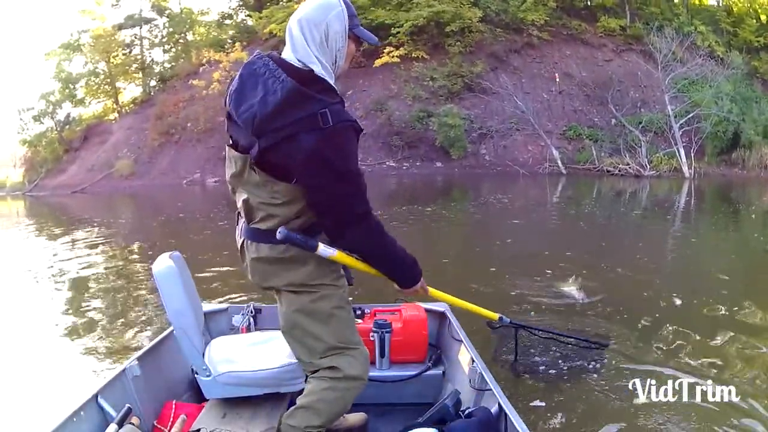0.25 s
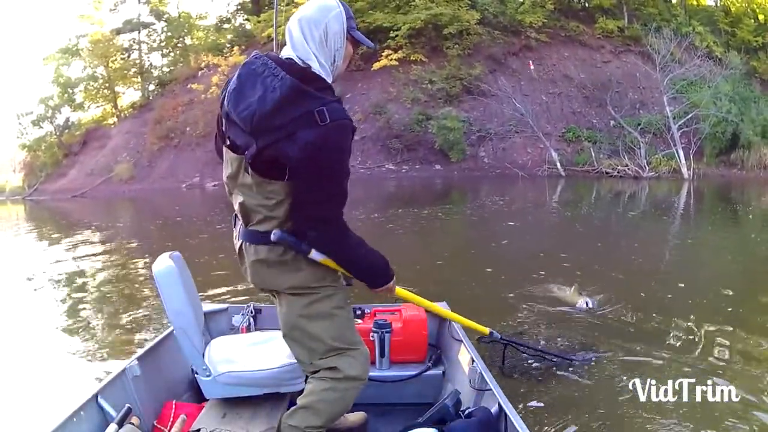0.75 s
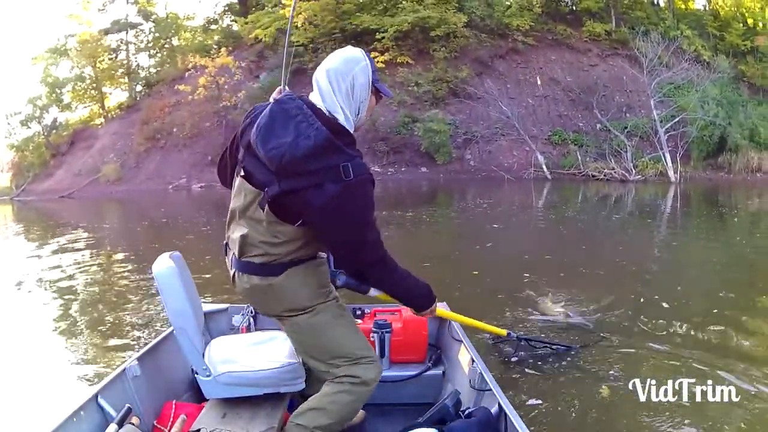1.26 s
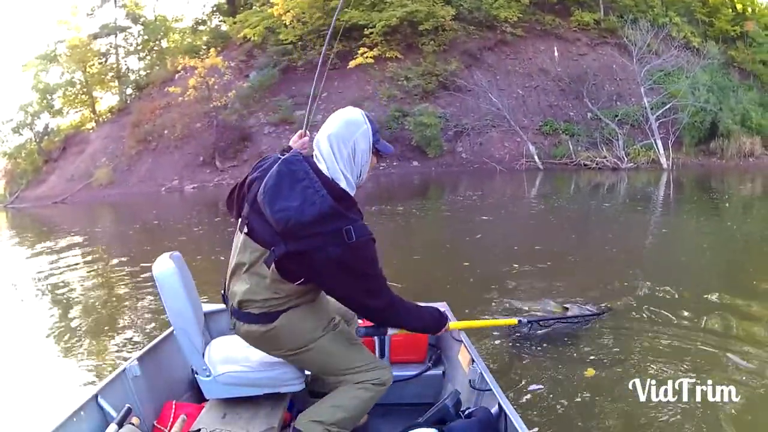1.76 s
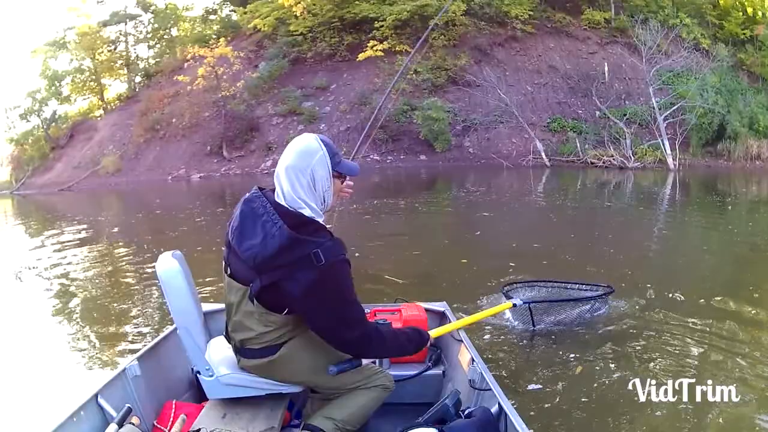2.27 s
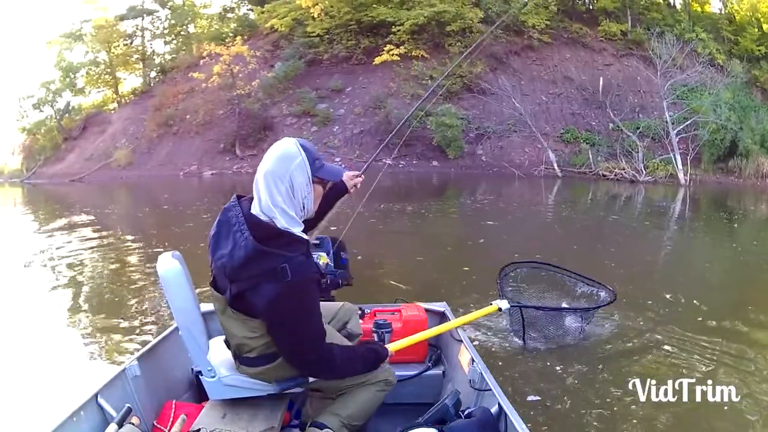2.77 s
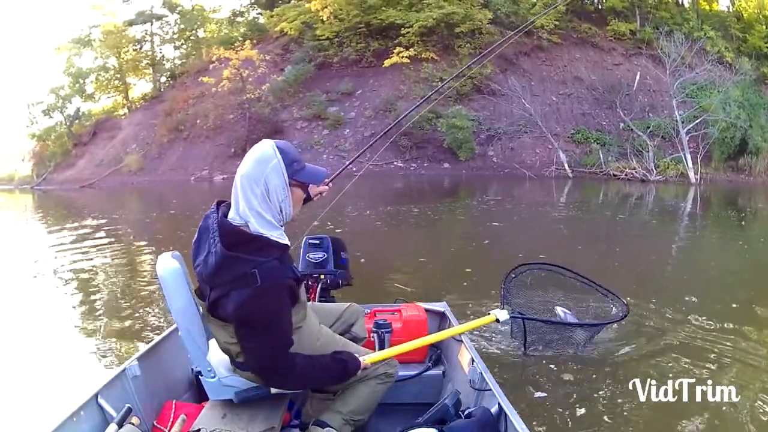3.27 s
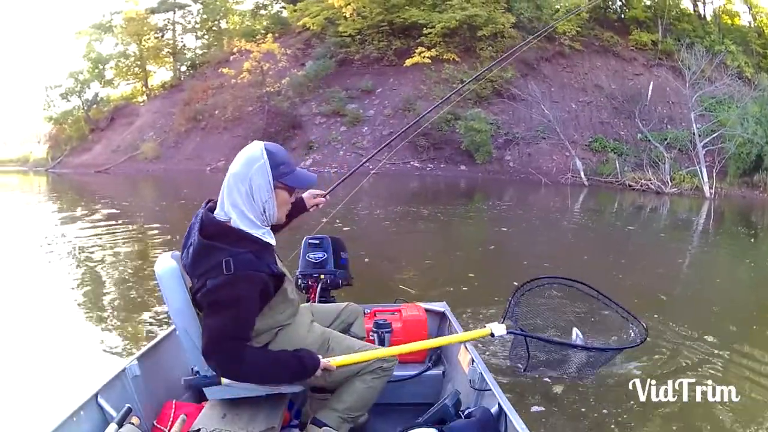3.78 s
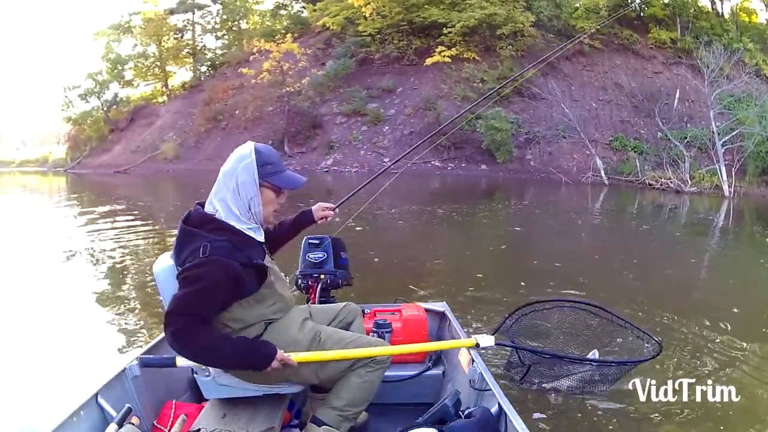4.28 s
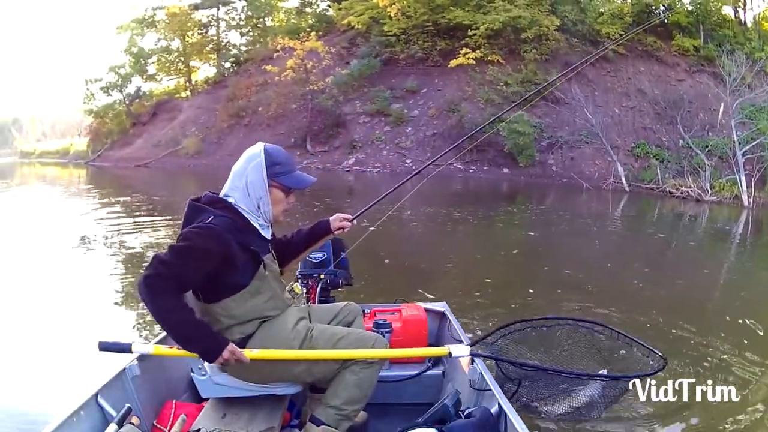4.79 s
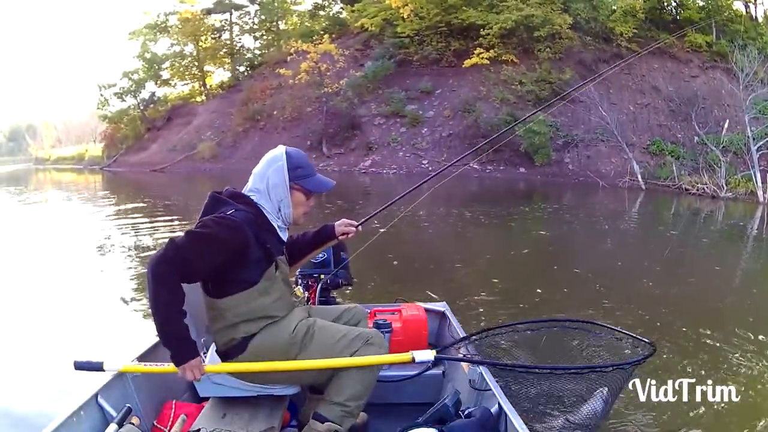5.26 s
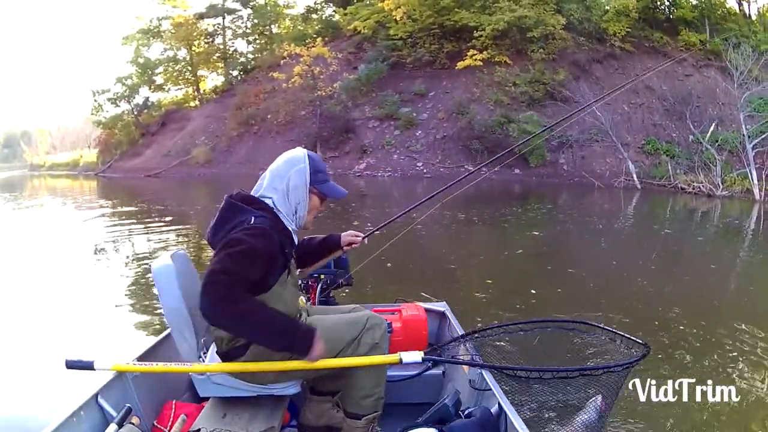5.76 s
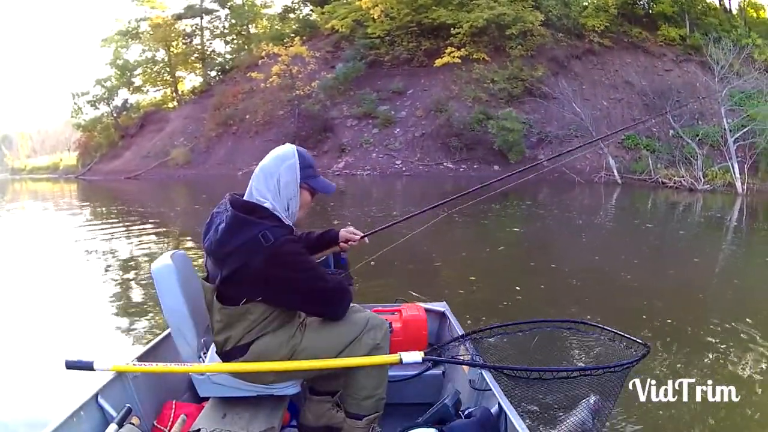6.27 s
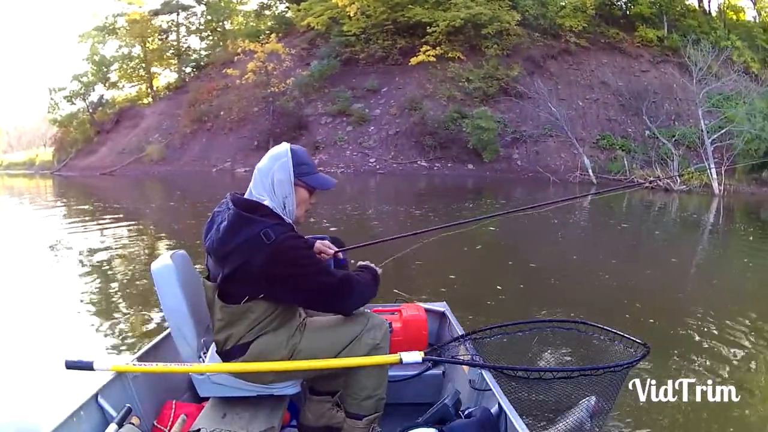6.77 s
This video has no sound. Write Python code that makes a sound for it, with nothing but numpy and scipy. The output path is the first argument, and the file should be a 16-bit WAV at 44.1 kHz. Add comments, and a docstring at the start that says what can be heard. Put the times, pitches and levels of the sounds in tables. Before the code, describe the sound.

A net pole bounces on a hollow metal hull: one abrupt bang with a quick rattle near the start, drips and tiny splashes after it, then a pause with barely audible taps. A busy, uneven clatter follows, dragging and booming along the rim, and stops. Gentle lapping, low wind, faint high ticks and distant bird chirps surround it, recorded close on a small camera microphone with thin hiss.

```python
"""Net pole on a small aluminium boat, calm river

Close by, a landing net's pole knocks, bounces and drags along the gunwale: noisy forces ring hollow hull modes.
The net sheds drops, made as rising bubble tones and noisy smacks; wind and water are shaped, wavering noise.
Faint high ticks are narrow noise bursts; an insect and a bird on the bank are pulsed and falling tones.
A weak drone, hiss, fuzzy flickering lines and a thin electrical whine pulsing high up lie underneath."""
import sys
import numpy as np
from scipy import signal
from scipy.fft import rfft, irfft, next_fast_len
from scipy.io import wavfile
from scipy.ndimage import uniform_filter1d, map_coordinates

SR = 44100
rng = np.random.default_rng(int(sys.argv[2]) if len(sys.argv) > 2 else 0)


def natural_amplitude(level_db):
    """Convert a level in decibels to a linear amplitude factor, elementwise."""
    exponent = np.asarray(level_db, float) / 20
    return 10 ** exponent


def dump(signal):
    """Clip the signal to [-1, 1] and save it as 16-bit WAV at the path in sys.argv[1]."""
    limited = np.clip(np.atleast_2d(signal).T, -1, 1)
    pcm = np.round(limited * 32767).astype(np.int16)
    wavfile.write(sys.argv[1], SR, pcm)


N = 310023  # length in samples, about 7 s

# main hull modes before each blow weights them: pitch_hz, level_db, t60_s
HULL_MODES = [(82, -35, 0.42), (119.7, -12.5, 0.76), (185.5, -5, 0.48), (236.5, -15, 0.63),
              (286.6, -1, 0.21), (342.3, -7.5, 0.38), (421.5, -8, 0.46), (462.8, -8.5, 0.53),
              (509.7, -9.5, 0.16), (618.3, -1.5, 0.23), (688.6, 0.5, 0.32), (711, -1.5, 0.06),
              (805, -2.5, 0.23), (860.7, 4, 0.16), (920, 0, 0.44), (946, 5.5, 0.16), (1000, 1, 0.33),
              (1081, -8, 0.19), (1153, 2.5, 0.093), (1198, 4, 0.13), (1568, -9.5, 0.25), (2010, -16, 0.091),
              (2230, -13, 0.16)]
# trend of the many lesser plate modes: pitch_hz, level_db, t60_s
LESSER_MODES = [(62.6, -25, 0.45), (207, -17.5, 0.4), (271, -4.5, 0.51), (596, -10, 0.31), (1000, -9, 0.3),
                (1230, -24, 0.15), (1350, -16, 0.27), (2250, -16, 0.23), (2650, -28, 0.12),
                (2690, -19, 0.22), (3420, -33, 0.16), (4146, -29, 0.19)]
# blows on the gunwale: start_s, level_db, crack_db (added to level_db), free_ring_s,
# favoured_hz, boom_db (weight of the low modes)
KNOCKS = [(1.89, -34, -21, 0.071, 586, -6), (1.922, -6, -34, 0.017, 850, -4),
          (1.945, -15.5, -61, 0.025, 715, -3), (1.972, -17.5, -63, 0.026, 600, -6),
          (2.183, -40, -14, 0.032, 640, -3), (2.211, -41, -13.5, 0.037, 815, -8),
          (2.589, -36, -21, 0.082, 860, -7), (2.919, -32.5, -34, 0.053, 850, -15),
          (3.366, -33.5, -38, 0.13, 1000, 3), (4.045, -29.5, -30, 0.05, 988, -15),
          (4.453, -15, -38, 0.046, 742, -2.5), (4.488, -17.5, -50, 0.098, 895, 0.5),
          (4.568, -25, -34, 0.02, 840, -7), (4.644, -18, -25, 0.042, 950, -4),
          (4.653, -10, -34, 0.0096, 920, -16), (4.719, -22.5, -27, 0.025, 960, -8),
          (4.736, -20, -29, 0.015, 996, -16), (4.758, -21, -35, 0.016, 970, -10),
          (4.855, -5.5, -28, 0.029, 920, 0), (4.879, -12, -49, 0.034, 687, -13),
          (4.907, -5.5, -18.5, 0.02, 940, 3), (4.919, -6.5, -29, 0.049, 640, -6.5),
          (5.108, -12.5, -20, 0.021, 944, 3), (5.127, -15.5, -35, 0.037, 510, -5),
          (5.176, -16, -19, 0.034, 894, 1), (5.204, -16.5, -54, 0.026, 520, -2),
          (5.276, -18.5, -23, 0.027, 802, -6), (5.282, -15.5, -19, 0.048, 590, -4),
          (5.373, -18, -18, 0.062, 620, -7), (5.396, -18, -24.5, 0.025, 794, -6),
          (5.416, -9.5, -34, 0.04, 990, 4), (5.43, -11.5, -37, 0.039, 695, 1),
          (5.457, -17, -22, 0.068, 693, 3.5), (5.561, -27.5, -27, 0.036, 478, 0),
          (5.592, -22.5, -27.5, 0.04, 950, -6)]
# colour of a blow's sharp front: pitch_hz, relative_db (per Hz)
CRACK_COLOUR = [(1500, 9.5), (2500, 5.5), (4500, -2), (7000, -8), (12000, -7), (15800, -15)]
# colour of loose rivets and gear: pitch_hz, relative_db (per Hz)
RATTLE_COLOUR = [(1300, -11), (2200, 10), (3200, 0), (4100, -2.5), (5500, -20), (8000, -28), (12500, -24),
                 (15800, -30)]
# pole pressing and sliding on the rim, before wavering: time_s, level_db
RUB_LEVEL = [(1.7, -75), (1.85, -62), (1.94, -47), (2.07, -51.5), (2.52, -54.5), (2.64, -44), (2.8, -49.5),
             (2.95, -55), (3.75, -52.5), (4.44, -50), (4.48, -42), (4.6, -40.5), (4.7, -37), (4.812, -37.5),
             (4.946, -38), (5.06, -44.5), (5.176, -52), (5.326, -36.5), (5.47, -37), (5.56, -44),
             (5.638, -51), (5.8, -68), (6.2, -98)]
# boat thudding as weight shifts: peak_s, level_db, rise_s, fall_t60_s
LURCHES = [(4.75, -41, 0.09, 0.39), (4.94, -35.5, 0.057, 0.84), (5.15, -51, 0.047, 1.),
           (5.33, -43, 0.028, 0.33), (5.44, -36, 0.024, 0.68), (5.55, -36.5, 0.08, 0.6)]
# colour of the thuds: pitch_hz, relative_db (per Hz)
LURCH_COLOUR = [(35, -35), (60, -9), (85, -1), (130, 3.5), (220, -6), (300, -31)]
# drops falling from the net into the river, before the envelope: start_s, level_db, bubble_hz
DRIPS = [(0.9544, -47, 1520), (1.465, -42, 1920), (1.5075, -48, 2190), (1.5484, -43, 1980),
         (1.7775, -46, 1900), (2.0622, -35, 1350), (2.1375, -39, 2010), (2.2473, -41, 1573),
         (2.3052, -40, 2230), (2.354, -35.5, 2250), (2.5207, -46, 1430), (2.594, -37, 1930),
         (2.6299, -39, 1760), (2.8544, -42, 2060), (3.0021, -42, 1856), (3.433, -45, 1660)]
# drops smacking the surface without a bubble, before the envelope: start_s, level_db, centre_hz
SPLATS = [(1.003, -48, 3500), (1.091, -53, 1500), (1.181, -58, 1500), (1.306, -50, 4000),
          (2.0078, -44, 5800), (2.0756, -44, 4540), (2.095, -38, 5870), (2.155, -56, 3300),
          (2.1834, -49, 3930), (2.2244, -35, 4380), (2.2503, -45, 3800), (2.3038, -35, 5730),
          (2.3476, -42, 3500), (2.4239, -43, 4440)]
# net stirring the water: centre_s, level_db, half_length_s
SWISHES = [(0.73, -56.5, 0.036), (2.62, -58.5, 0.082), (2.755, -64, 0.099), (2.24, -59, 0.06)]
# wind on the microphone, before wavering: time_s, level_db
WIND_LEVEL = [(0, -46.5), (.5, -44.5), (1.3, -46.5), (1.85, -41.5), (2.4, -45.5), (3.1, -42), (4.4, -43.5),
              (5.8, -47.5), (7.03, -48)]
# colour of the wind: pitch_hz, relative_db (per Hz)
WIND_COLOUR = [(12, -46), (22, -9.5), (45, -2), (100, -6), (170, -9), (300, -36.5)]
# water around hull and net, before wavering: time_s, lapping_db, trickle_db
WATER_LEVEL = [(0, -49.5, -66), (.5, -51, -68), (.8, -49.5, -67), (1.05, -50, -67.5), (1.6, -50, -66),
               (2.1, -48.5, -64.5), (2.5, -50.5, -66), (3.25, -50.5, -64), (4.1, -52, -65),
               (5.8, -50.5, -66), (6.56, -51.5, -65.5), (7.03, -51.5, -63)]
# colour of lapping at the hull: pitch_hz, relative_db (per Hz)
LAPPING_COLOUR = [(120, -44), (200, -1), (300, -1), (345, -4.5), (400, -9), (650, -7.5), (850, -9),
                  (1100, -19.5), (1500, -40)]
# colour of the far trickle: pitch_hz, relative_db (per Hz)
TRICKLE_COLOUR = [(900, -23), (1200, 0), (2200, 0.5), (2550, -7), (2750, -3.5), (3200, -13), (4000, -5.5),
                  (5000, -18)]
# faint high ticks, before the envelope: start_s, level_db, pitch_hz
TICKS = [(0.07, -62, 12600), (0.258, -54.5, 13000), (0.31, -58, 12700), (0.5457, -63, 12650),
         (0.671, -57, 13400), (0.6943, -54.5, 12900), (1.1, -60, 12700), (1.306, -60, 12600),
         (2.297, -63, 11700), (2.678, -61, 12800), (3.1388, -61, 13600), (3.9938, -60, 13700),
         (4.21, -62, 13700), (4.6289, -58, 13700), (5.134, -57, 13800), (5.648, -61, 13700),
         (5.773, -59, 13400), (5.8292, -60, 13600), (6.006, -59, 13900), (6.112, -57, 12600),
         (6.2687, -59, 13700), (6.4837, -59, 13700), (6.506, -58, 13500), (6.6518, -58, 13600),
         (6.8453, -57, 13600)]
# far insect's tone and its overtone, before wavering: pitch_hz, level_db
INSECT = [(2740, -78), (5485, -79.5)]
# far bird's falling chirps: start_s, peak_db, start_hz, end_hz, length_s
CHIRPS = [(3.955, -87, 5300, 5050, .035), (4.025, -72, 4580, 4050, 0.051), (4.175, -69, 4680, 4000, .055),
          (6.625, -67, 4600, 4300, .04)]
# faint drone: time_s, level_db
DRONE_LEVEL = [(0, -55.5), (.6, -60), (1.1, -49), (1.5, -59), (2.4, -54), (3, -80), (7.03, -73)]
# colour of the drone: pitch_hz, relative_db (per Hz)
DRONE_COLOUR = [(325, -3), (340, -12), (352, 8), (368, -12)]
# colour of the electronic hiss: pitch_hz, relative_db (per Hz)
HISS_COLOUR = [(3000, 0.5), (4500, -0.5), (5500, 2), (7500, -1.5), (9500, 1.5), (11000, 0.5), (12000, 1.5),
               (13700, 3.5), (14800, 2.5), (15800, 4)]
# faint unsteady lines, before wavering: pitch_hz, level_db
FLICKER = [(1850, -97), (4000, -89), (5560, -85), (11000, -79), (13750, -86)]

BOOM_HZ, CLANG_HZ = 400, 1250  # borders between low, middle and high hull modes
TOP_HZ = 15870  # upper limit of the band
CREST_DB = 11  # a blow's level_db over the rms of its middle modes in the first 25 ms, before damping
DULLING_DB = 9.5  # loss per unit of log frequency above the favoured modes: a padded contact
BOOM_RISE_S = 0.0027  # time constant: the big panels take a moment to start moving
CLANG_FADE_S = 0.26  # time constant: the resting pole stills the high modes first
KNOCK_CLANG_DB, CLANG_PER_CRACK = 16, 0.39  # high-mode weight; dB added per dB of crack_db
RUB_BOOM_DB, RUB_CLANG_DB = 0.5, -4.5  # weights of low and high modes
RUB_DULLING = 0.15  # dB of clang lost per dB of rubbing above the median: pressing muffles high modes
INSECT_RATE, INSECT_START_S, INSECT_ON = 9.95, 0.066, 0.6  # pulses per s, offset in s, part of cycle on
WHINE_HZ, WHINE_PULSES = 15478, 57.334  # pitch in Hz, pulses per s


def knocks(modes, part, hz):
    """Each blow wakes the modes anew from its own spot; the pole settling back damps the ring."""
    out, t = np.zeros(N), np.arange(SR // 4) / SR
    for s, db, crack_db, free_s, favoured_hz, boom_db in KNOCKS:
        chatter = rng.standard_normal((3, len(t)))
        luck = rng.standard_normal((2, len(hz)))
        octave_like = np.log(hz / favoured_hz)
        near = np.exp(-(octave_like / 0.19) ** 2)
        spot_db = 6.7 * near + 3.84 * luck[0] - DULLING_DB * np.clip(octave_like, 0, 0.6)
        # favoured modes mostly start in step
        spot = natural_amplitude(spot_db) * np.sign(luck[1] + 3 * near)
        force = 0.036 * chatter[0] * np.exp(-t / 0.056) + np.exp(-t / 0.00023)
        ring = parts(modes[:, :len(t)], part, spot)
        low, mid, high = signal.fftconvolve(ring, force[None], axes=1)[:, :len(t)]
        size = natural_amplitude(db - CREST_DB) / np.sqrt(np.mean(mid[:SR // 40] ** 2))
        boom = natural_amplitude(boom_db) * (1 - np.exp(-t / BOOM_RISE_S)) * low
        clang = natural_amplitude(KNOCK_CLANG_DB + CLANG_PER_CRACK * crack_db) * high * np.exp(-t / CLANG_FADE_S)
        # the gain falls to a third once the pole rests
        contact_gain = 0.33 + 0.65 * np.exp(-(t / free_s) ** 4)
        fade_out = np.cos(np.pi / 2 * t / t[-1])
        add(out, s, size * contact_gain * fade_out * (boom + mid + clang))
        crack = np.exp(-t / 0.012) * coloured(chatter[1], CRACK_COLOUR)
        rattle = 0.41 * np.exp(-(t / 0.024) ** 2.0) * coloured(chatter[2], RATTLE_COLOUR)
        add(out, s, natural_amplitude(db + crack_db) * (1 - np.exp(-t / 0.00076)) * (crack + rattle))
    return out


def rub(modes, part, hz):
    """The sliding pole feeds the hull a gritty, uneven force, so its modes ring without pause."""
    rub_db = curves(RUB_LEVEL)[0]
    grit = rng.standard_normal(N) * natural_amplitude(rub_db + 2.36 * wobble(25) + 2.1 * wobble(300))
    # neighbouring modes start with opposite signs
    ring = parts(modes, part, (-1) ** np.arange(len(part)))
    low, mid, high = signal.fftconvolve(ring, grit[None], axes=1)[:, :N] / np.linalg.norm(ring[1])
    clang_db = RUB_CLANG_DB - RUB_DULLING * (rub_db - np.median(rub_db))
    return natural_amplitude(RUB_BOOM_DB) * low + mid + natural_amplitude(clang_db) * high


def hull_modes():
    """Each mode's answer to one push: a sine that builds up over about two cycles and decays."""
    knots, lesser_db, lesser_t60 = np.transpose(LESSER_MODES)
    lesser = np.sort(rng.uniform(knots[0], knots[-1], size=150))
    crowd = np.c_[lesser, np.interp(lesser, knots, lesser_db), np.interp(lesser, knots, lesser_t60)]
    hz, db, t60 = np.transpose(np.vstack([HULL_MODES, crowd]))[:, :, None]
    t = np.arange(SR // 3) / SR
    decay = natural_amplitude(db - 60 * t / t60)
    build_up = 1 - np.exp(-t * hz / 2.25)
    modes = decay * build_up * np.sin(2 * np.pi * hz * t)
    return modes, np.digitize(hz[:, 0], [BOOM_HZ, CLANG_HZ]), hz[:, 0]


def parts(modes, part, weight):
    """Weighted modes summed into low, middle and high groups."""
    return np.array([(weight * (part == k)) @ modes for k in range(3)])


def rocking():
    """A dull, lumpy thud through the whole hull: noise swells quickly at each lurch and dies away."""
    t = np.arange(N) / SR
    swell = np.zeros(N)
    for s, db, rise, t60 in LURCHES:
        fall = natural_amplitude(db - 60 * np.clip(t - s, 0, 9) / t60)
        swell += fall * np.exp(-(np.clip(s - t, 0, 9) / rise) ** 2)
    return swell * coloured(rng.standard_normal(N), LURCH_COLOUR)


def drips():
    """Each drop traps a bubble whose pitch rises as it dies; small ones fall while the wet net is up."""
    out, t = np.zeros(N), np.arange(SR // 20) / SR
    draw = rng.random((110, 3))
    small = np.c_[2.0 + 2.3 * draw[:, 0] ** 1.8, -60 + 9 * draw[:, 1], 1000 * 5 ** draw[:, 2]]
    for s, db, hz in [*DRIPS, *small]:
        life = 4.7 / hz
        phase = 2 * np.pi * hz * (t + 0.014 * t ** 2 / life)
        add(out, s, natural_amplitude(db) * (1 - np.exp(-t / 0.0011)) * np.exp(-t / life) * np.sin(phase))
    return out


def splats():
    """A smack is a tone dying in a few cycles with spray noise; lighter ones fall as the net drains."""
    out, t = np.zeros(N), np.arange(SR // 100) / SR
    draw = rng.random((70, 3))
    light = np.c_[2.0 + 0.9 * draw[:, 0] ** 1.8, -56 + 10 * draw[:, 1], 1500 * 4.2 ** draw[:, 2]]
    for s, db, hz in [*SPLATS, *light]:
        spray = 0.5 * coloured(rng.standard_normal(len(t)), [(0.4 * hz, -20), (hz, 0), (2 * hz, -12)])
        envelope = (1 - np.exp(-t / 0.00037)) * np.exp(-t * hz / 3)
        add(out, s, natural_amplitude(db) * envelope * (np.sin(2 * np.pi * hz * t) + spray))
    return out


def swishes():
    """Brief grainy swells of water stirred by the net."""
    t = np.arange(N) / SR
    swell = sum(natural_amplitude(db) * np.exp(-((t - s) / half) ** 2) for s, db, half in SWISHES)
    grains = rng.standard_normal(N) * natural_amplitude(3.0 * wobble(200))
    return swell * coloured(grains, [(700, -22), (1000, 9), (2300, 1), (3000, -12), (14000, -24)])


def river():
    """Water lapping against the hull and trickling far off: two bands of patchy noise."""
    lapping_db, trickle_db = curves(WATER_LEVEL)
    lapping = natural_amplitude(lapping_db + 0.32 * wobble(5.3)) * rush(LAPPING_COLOUR, patchy_db=-0.6)
    trickle = natural_amplitude(trickle_db + 0.35 * wobble(23)) * rush(TRICKLE_COLOUR, patchy_db=2.0)
    return lapping + trickle


def wind():
    """Wind on the microphone: low rumbling noise, slowly wavering."""
    return natural_amplitude(curves(WIND_LEVEL)[0] + 1.18 * wobble(4)) * rush(WIND_COLOUR, patchy_db=1.1)


def ticks():
    """Short flat-topped bursts of narrow noise high in the treble; fainter ones come at random."""
    out, t = np.zeros(N), np.arange(SR // 10) / SR
    draw = rng.random((8, 2))
    faint = np.c_[draw[:, 0] * N / SR, np.full(len(draw), -61.5), 11500 + 2400 * draw[:, 1]]
    shape = (1 - np.exp(-t / 0.0018)) * np.exp(-(t / 0.018) ** 4)
    for s, db, hz in [*TICKS, *faint]:
        band = [(0.69 * hz, -20), (1.0 * hz, -6), (hz, 0), (1.08 * hz, -6), (min(1.15 * hz, TOP_HZ), -22)]
        add(out, s, natural_amplitude(db) * shape * coloured(rng.standard_normal(len(t)), band))
    return out


def insect():
    """A far insect on the bank: two tones gated into even pulses, drifting in phase."""
    t = np.arange(N) / SR
    on = (t - INSECT_START_S) * INSECT_RATE % 1 < INSECT_ON
    gate = uniform_filter1d(1. * on, size=400)
    drift = 1.6 * wobble(40)
    tones = sum(natural_amplitude(db) * np.sin(2 * np.pi * hz * t + drift) for hz, db in INSECT)
    return gate * natural_amplitude(1.1 * wobble(4.2)) * tones


def bird():
    """A far bird on the bank: short rounded tones gliding downwards."""
    out = np.zeros(N)
    for s, db, start_hz, end_hz, length in CHIRPS:
        u = np.linspace(0, 1, round(length * SR))
        pitch = start_hz + (end_hz - start_hz) * u ** 1.5
        envelope = np.sqrt(np.sin(np.pi * u) + 1e-9)
        add(out, s, natural_amplitude(db) * envelope * np.sin(2 * np.pi * np.cumsum(pitch) / SR))
    return out


def drone():
    """A faint wavering drone: a very narrow band of noise."""
    return natural_amplitude(curves(DRONE_LEVEL)[0]) * coloured(rng.standard_normal(N), DRONE_COLOUR)


def hiss():
    """The hiss of the electronics: patchy treble noise, gently wavering."""
    return natural_amplitude(-65 + 1.2 * wobble(3.05)) * rush(HISS_COLOUR, patchy_db=2.3)


def flicker():
    """Thin lines in the hiss, made fuzzy by wavering phase and unsteady by wavering level."""
    t = np.arange(N) / SR
    out = np.zeros(N)
    for hz, db in FLICKER:
        out += natural_amplitude(db + 3.2 * wobble(35)) * np.sin(2 * np.pi * hz * t + 2.5 * wobble(150))
    return out


def whine():
    """A high electrical tone switched off for about a third of every cycle of its pulsing."""
    t = np.arange(N) / SR
    gate = np.abs(t * WHINE_PULSES % 1 - 0.5) > 0.18
    return natural_amplitude(-65.0) * uniform_filter1d(gate * 1., size=60) * np.sin(2 * np.pi * WHINE_HZ * t)


def unit(x):
    """Scaled to rms 1."""
    return x / np.sqrt(np.mean(x ** 2) + 1e-20)


def curves(rows):
    """One value per sample for each column after the time."""
    s, *cols = np.transpose(rows)
    return [np.interp(np.arange(N) / SR, s, c) for c in cols]


def wobble(rate):
    """A smooth random curve, rate knots a second."""
    knots = rng.standard_normal(int(N * rate / SR) + 4)
    return map_coordinates(knots, [np.arange(N) * rate / SR])


def coloured(x, spectrum):
    """x through (Hz, dB) points read on a log axis, brought to rms 1."""
    m = next_fast_len(len(x) + 8192)
    hz, db = np.transpose(spectrum)
    log_hz = np.log(np.fft.rfftfreq(m, 1 / SR) + 1)
    gain = natural_amplitude(np.interp(log_hz, np.log(hz), db, left=-120, right=-120))
    return unit(irfft(rfft(x, m) * gain, m)[:len(x)])


def rush(spectrum, patchy_db):
    """Noise with patches of random gain in time and frequency, coloured to rms 1."""
    z = signal.stft(rng.standard_normal(N + 512), nperseg=512)[2]
    field = uniform_filter1d(rng.standard_normal(z.shape), size=5, axis=0)
    field = uniform_filter1d(field, size=8, axis=1)
    patchy = signal.istft(z * natural_amplitude(patchy_db * unit(field)), nperseg=512)[1][:N]
    return coloured(patchy, spectrum)


def add(track, s, sound):
    """Mixes a sound into a track at a time in seconds."""
    part = track[round(s * SR):][:len(sound)]
    part += sound[:len(part)]


def scene():
    """The boat, the net, the river and its bank at one microphone."""
    hull = hull_modes()
    boat = knocks(*hull) + rub(*hull) + rocking()
    water = drips() + splats() + swishes() + river()
    bank = insect() + bird()
    background = wind() + ticks() + drone() + hiss() + flicker() + whine()
    return (boat + water + bank + background)[None]


def band_limit(x):
    """A steep low-pass at the top of the band."""
    return signal.sosfilt(signal.butter(12, 16630, fs=SR, output="sos"), x)


def record(dry):
    """The camera rounds off the loudest peaks and limits the band."""
    soft = dry / (1 + np.abs(dry / 0.55) ** 3) ** (1 / 3)
    limited = signal.sosfilt(signal.butter(12, TOP_HZ, fs=SR, output="sos"), soft)
    return band_limit(limited)


dry = scene()
out = record(dry)
dump(out)
```